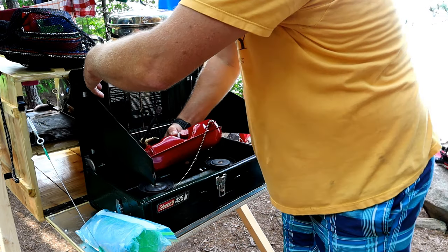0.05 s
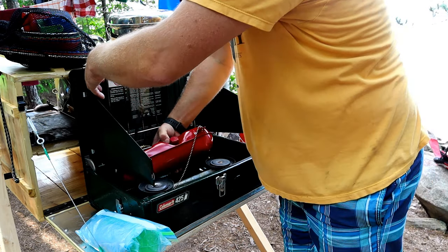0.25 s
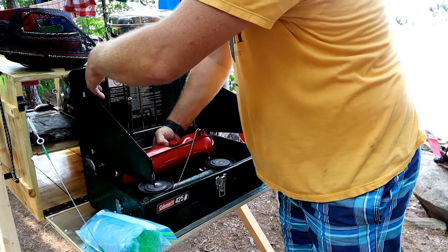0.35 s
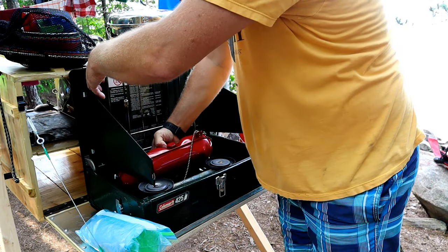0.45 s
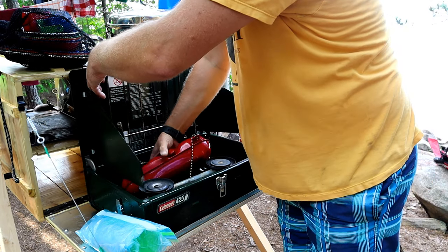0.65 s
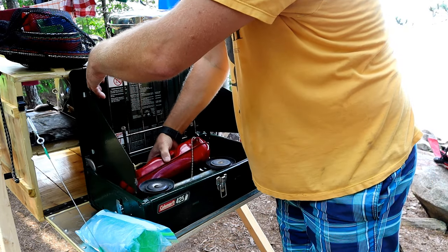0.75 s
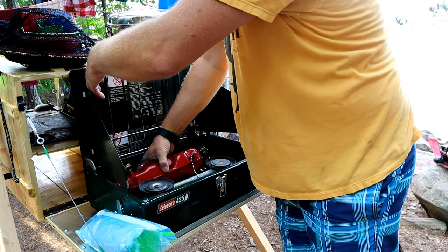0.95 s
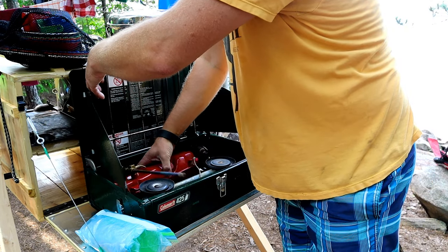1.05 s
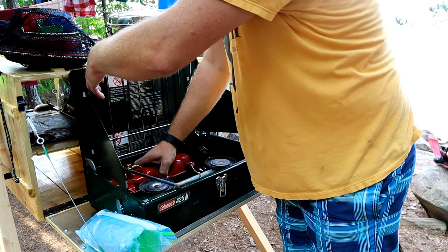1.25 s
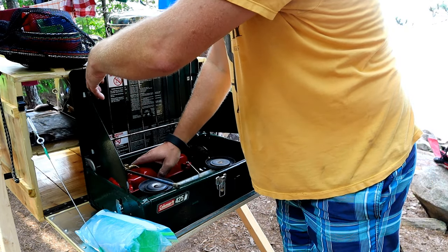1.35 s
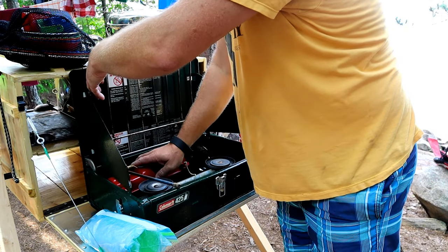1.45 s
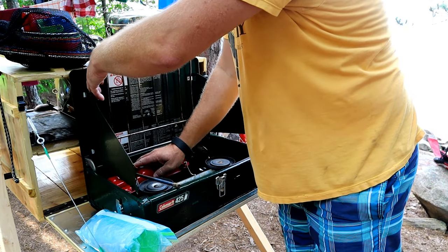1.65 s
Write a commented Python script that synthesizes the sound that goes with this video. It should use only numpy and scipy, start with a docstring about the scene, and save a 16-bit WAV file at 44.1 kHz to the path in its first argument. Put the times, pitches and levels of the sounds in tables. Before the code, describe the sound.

Close, bright metal knocking and rattling as a hollow tank is set inside a thin metal stove box; irregular clanks crowd together mid-way, then thin out, with soft low table thuds and quiet open-air hiss.

```python
"""Fuel tank knocking into a stove case

A steel fuel tank is lowered into the sheet-metal case of a camp stove, outdoors. Each knock rings
decaying sine modes: a blow rings the clear ones, blow plus rattle of loose parts the dense sheet ones.
Where it lands decides which modes sound loudest. Below lie low shudders of the table, made of
band-passed noise, and a quiet outdoor hush of drifting, spectrally shaped noise."""
import sys
import numpy as np
from scipy import signal
from scipy.fft import rfft, irfft, next_fast_len
from scipy.io import wavfile
from scipy.ndimage import uniform_filter1d

SR = 44100
rng = np.random.default_rng(int(sys.argv[2]) if len(sys.argv) > 2 else 0)


def transcribe(u):
    """Save the signal u as a 16-bit wav file named by the first command-line argument.

    u: samples, shape (n,) or (channels, n), limited to [-1, 1]; the rate is SR.
    q: integer samples, one column per channel.
    """
    v = np.clip(np.atleast_2d(u).T, -1, 1)
    q = np.round(v * 32767).astype(np.int16)
    wavfile.write(sys.argv[1], SR, q)


N = 74970

# Knocks, relative levels: (time [s], clank peak [dB], boom [dB], body [dB], sizzle [dB],
# favoured low mode [Hz], its lift [dB], favoured high mode [Hz], its lift [dB], rattle t60 [s])
KNOCKS = [(0.205,1,-10,-14,-21,948,15.5,3350,6,0.03),(.217,-12,-4,-21,-24,402,12,1630,15,0.16),(.236,-4,-23,-17.5,-20,380,-1,2700,5,0.14),(.265,-9,-14.5,-25.5,-41,670,12,1820,9,0.21),(0.2971,-10.5,-23,-22.5,-24.5,1180,6,1700,6,0.11),(.325,-13.5,-17,-52,-31.5,397,20,3030,6,0.019),(.355,-15,-25.5,-23.5,-42,396,5,3730,9,0.44),
          (0.435,-11.5,-5.5,-26,-30,180,3,2300,3,0.056),(0.4428,-30,-12,-15.5,-25.5,481.3,19,1730,17,0.047),(.451,-3.5,-24,-12,-23.5,180,4,2220,14.5,0.066),(.468,-6,-14,-17.5,-17.5,182,10,2840,10.5,0.087),(0.4944,-4,-12.5,-20.5,-26,940,17,4900,5,0.1),(0.5484,-23.5,-39,-22,-41.5,944,14,2400,8,0.2),(.596,-26,-33,-21.5,-53,914,17.5,2300,12,0.11),(0.605,-17.5,-19.5,-26,-37,238,16.5,950,9,0.38),(.618,-26,-31.5,-31.5,-45,400,13.5,1730,9,.1),(0.649,-17,-46,-26.5,-50,980,14,1960,6,0.49),
          (0.6907,-10.5,-27,-23,-25,398,3,2350,7.5,0.19),(0.715,-4.5,-16.5,-15.5,-18.5,1810,12.5,4470,7.5,0.17),(0.7395,-10.5,-16.5,-11,-24.5,247,8,2350,16,0.075),(.758,3,-15,-11.5,-14.5,1600,6,2750,7.5,0.037),(0.779,-9.5,-28,-10.5,-20,940,10.5,3530,10.5,0.045),(0.7993,-5,-11.5,-14.5,-21,404,5.5,931,8.5,0.23),(0.8386,-6.5,-33,-18,-25.5,690,5,1850,4,0.077),(0.8636,-6,-13,-18.5,-29.5,177,0,1614,7,0.2),(0.8828,-11.5,-35,-12.5,-24.5,410,13.5,2030,13,0.27),(0.9314,-9,-19.5,-14,-40,917,15.5,1720,7.5,0.2),(0.9446,-15.5,-31,-10,-24,481,9,935,12,.14),(0.9549,-27,-39,-19.5,-44,943,17,4470,22,0.23),(0.9948,-7,-21,-13.5,-27,560,-13,2800,5,0.079),(1.049,-9,-25,-16,-37.5,480,15,2650,4,0.32),(1.098,-10,-28,-16,-33.5,510,12,2830,10.5,0.086),(1.1292,-17.5,-30,-16,-47,507,-1,1670,12,0.075),(1.1446,-8.5,-20,-14.5,-35.5,393,3,1470,0,0.054),(1.1552,-13.5,-27,-10.5,-33,924,14,1960,13,0.08),(1.164,-8,-13.5,-18.5,-23,397,14,930,23,0.18),(1.194,-9.5,-20.5,-14,-20,870,6.5,4390,7,0.081),
          (1.2612,0,-15,-12,-20,893,10.5,4670,3,0.033),(1.2897,-10.5,-27,-12.5,-33.5,932,15,6000,10,0.044),(1.321,-17.5,-21.5,-20,-35,690,-12,1236,15.5,0.95),(1.393,-7,-21.5,-13.5,-28.5,898,12,1300,5,0.052),(1.428,-15.5,-21,-26,-30.5,980,8,4450,11.5,0.048),(1.4704,-21.5,-25,-25,-42.5,684,-5,1480,4,0.44),(1.5323,-15.5,-22,-21,-56,348,6,1260,7,0.041),(1.5511,-27,-26,-28,-40,454,-1,2135,3,0.042),(1.6747,-32,-39,-60,-87,513,10,2130,12,.12)]
# Centres of the level regions: (boom [Hz], body [Hz], clank [Hz], sizzle [Hz])
REGIONS_HZ = (200, 600, 2200, 8000)
# Clear modes of case and tank: (frequency [Hz], relative level [dB], t60 [s])
CLEAR_MODES = [(181.8, -0.5, 0.18), (227.7, -5.5, 0.4), (242.7, -8, 0.11), (260.5, -9.5, 0.62),
               (396, -3.5, 0.28), (443.7, -5.5, 0.16), (489.8, -4, 0.075), (699, -8, 0.4),
               (818, -10.5, 0.24), (915.3, -12, 0.17), (941.3, -10, 0.15), (1151, -8.5, 0.16),
               (1290, -23, 0.06), (1634, -7, 0.061), (2047, -2.5, 0.062), (2360, -10.5, 0.32),
               (3300, -6, 0.043), (4550, -4.5, 0.1), (6070, -14, 0.27), (11530, 4, 0.09)]
# Curves for the dense small modes of the thin sheet: (frequency [Hz], relative level [dB],
# t60 before scatter [s])
SHEET_CURVE = [(250.2, -19.5, 0.25), (706, -25.5, 0.36), (1480, -21, 0.2), (2840, -20, 0.17),
               (6800, -18.5, 0.13), (9300, -25, 0.12), (10450, -17.5, 0.11), (13500, -23, 0.024),
               (15633, -52, 0.04)]
# Left-right likeness of a knock's modes: (frequency [Hz], likeness [0..1])
KNOCK_LIKENESS = [(300, 1), (600, 1), (1300, 0.88), (2500, 0.83), (7000, 0.08), (14000, 0.75)]
# Stereo lean of a knock's modes: (frequency [Hz], left minus right [dB])
KNOCK_LEAN = [(500, 0), (1200, .6), (2500, -1.8), (5000, 2.7), (9000, 0)]
# Hush spectrum: (frequency [Hz], relative density [dB])
HUSH_SPECTRUM = [(15, -34), (25, 5), (383, 4.5), (1210, -0.5), (3540, 0), (5570, -7.5), (6200, -9),
                 (7680, -9), (11200, -7), (15000, -17.5)]
# Left-right likeness of the hush: (frequency [Hz], likeness [-1..1])
HUSH_LIKENESS = [(60, 1), (380, -0.064), (2360, -0.028), (14800, -0.38)]
# Shudder of the table under the stove: (time [s], level [dB])
RUMBLE_LEVEL = [(0.15, -69), (0.244, -36), (0.288, -47), (0.706, -51), (0.783, -34), (1.124, -54),
                (1.17, -39.5), (1.3, -46), (1.7, -54)]

SHEET_COUNT = 1800
RISE_TURNS = 0.47  # cycles over which a mode swells
KNOCK_GAIN_DB, CREST_DB = -6.5, 12  # crest: a clank's peak over its mean level
FAVOUR_OCT = 0.075  # width of the lift around a favoured mode
CLEAR_SCATTER_DB, SHEET_SCATTER_DB = 1.2, 2.5
CHOKE_DB_PER_S = 247  # the next contact damps the clear modes still ringing
BLOW_DB, RATTLE_PER_S, RATTLE_SPREAD_DB = -0.5, 1200, 3
LIGHT_TAP_HZ = 470  # light taps barely move modes below this
BASS_CUT_HZ, RIGHT_LAG_S = 135, 4.2e-5
HUSH_DB, HUSH_LATE_DB, HUSH_PATCH_DB = -48, -7.5, 2.7  # late: treble change by the end
CEILING, EDGE_HZ = 1.05, 15400


def clatter():
    """Blows ring the clear modes until the next contact; blow and rattle ring the sheet; right lags."""
    hz, db, rings = steel()
    count = len(CLEAR_MODES)
    struck = np.array([strike_weights(hz, db, *row[1:-1]) for row in KNOCKS], dtype=np.float32)
    clear = struck[..., :count] @ rings[:count]
    sheet = struck[..., count:].reshape(-1, SHEET_COUNT) @ rings[count:]
    sheet = sheet.reshape(clear.shape)
    out = np.zeros((2, N))
    t = np.arange(clear.shape[2]) / SR
    gaps_s = np.diff([row[0] for row in KNOCKS], append=N / SR)
    for row, gap_s, clear_ring, sheet_ring in zip(KNOCKS, gaps_s, clear, sheet):
        choke = amp(-CHOKE_DB_PER_S * np.maximum(t - gap_s, 0))
        add(out, row[0], clear_ring * choke)
        taps = blow_and_rattle(row[-1], rng.random((3, SR // 6)))
        add(out, row[0], signal.fftconvolve(sheet_ring, taps[None], axes=1))
    out = signal.sosfilt(signal.butter(4, BASS_CUT_HZ, "high", fs=SR, output="sos"), out)
    size = next_fast_len(N)
    lag = np.exp(-2j * np.pi * np.fft.rfftfreq(size, 1 / SR) * RIGHT_LAG_S)
    right = irfft(rfft(out[1], size) * lag, size)[:N]
    return np.array([out[0], right])


def steel():
    """Modes of the metal: frequencies, levels and exponentially decaying sines."""
    curve_hz, curve_db, curve_t60_s = np.transpose(SHEET_CURVE)
    place = (np.arange(SHEET_COUNT) + rng.random(SHEET_COUNT)) / SHEET_COUNT
    sheet_hz = curve_hz[0] + (curve_hz[-1] - curve_hz[0]) * place ** 1.3  # denser at the low end
    sheet_db = read(curve_hz, curve_db, sheet_hz)
    sheet_t60_s = read(curve_hz, curve_t60_s, sheet_hz) * rng.uniform(0.7, 1.5, SHEET_COUNT)
    hz, db, t60_s = np.hstack([np.transpose(CLEAR_MODES), [sheet_hz, sheet_db, sheet_t60_s]])
    t = np.arange(SR // 4, dtype=np.float32) / SR
    turns = np.outer(hz, t).astype(np.float32)
    decay = np.exp(np.outer(-np.log(1000) / t60_s, t).astype(np.float32))
    rings = np.sin(2 * np.pi * turns) * decay
    return hz, db, rings * np.minimum(turns / RISE_TURNS, 1)


def strike_weights(hz, db, clank_db, boom_db, body_db, sizzle_db, low_hz, low_db, high_hz, high_db):
    """Landing place sets how strongly one knock rings each mode in the left and right channels."""
    same = np.clip(read(*np.transpose(KNOCK_LIKENESS), hz), 0, 1)
    lean = amp(read(*np.transpose(KNOCK_LEAN), hz) / 2)
    scatter, sign, other = rng.standard_normal((3, len(hz)))
    sign = np.sign(sign)
    lift_db = sum(lift * np.exp(-(np.log2(hz / centre_hz) / FAVOUR_OCT) ** 2)
                  for centre_hz, lift in ((low_hz, low_db), (high_hz, high_db)))
    is_clear = np.arange(len(hz)) < len(CLEAR_MODES)
    scatter_db = np.where(is_clear, CLEAR_SCATTER_DB, SHEET_SCATTER_DB) * scatter
    region_db = read(REGIONS_HZ, [boom_db, body_db, clank_db - CREST_DB, sizzle_db], hz)
    left = sign * lean
    right = (same * sign + np.sqrt(1 - same ** 2) * other) / lean
    return np.array([left, right]) * amp(KNOCK_GAIN_DB + db + region_db + lift_db + scatter_db)


def blow_and_rattle(t60_s, draws):
    """One heavy impulse, then random signed taps of loose parts, dying away exponentially."""
    t = np.arange(draws.shape[1]) / SR
    hits = draws[0] < RATTLE_PER_S / SR
    taps = hits * np.sign(draws[1] - 0.5) * amp(-RATTLE_SPREAD_DB * np.log(draws[2] + 0.0043))
    taps = taps * amp(-60 * t / max(t60_s, 0.004))
    taps = taps / (np.linalg.norm(taps) + 1e-9)
    taps = signal.lfilter(*signal.butter(1, LIGHT_TAP_HZ, "high", fs=SR), taps)
    taps[0] = amp(BLOW_DB)
    return taps


def rumble():
    """Table shudder: low band-passed noise under a level curve, alike in both channels."""
    band = signal.butter(3, (60, 125), "band", fs=SR, output="sos")
    x = signal.sosfilt(band, rng.standard_normal(N))
    return x / x.std() * amp(np.interp(np.arange(N) / SR, *np.transpose(RUMBLE_LEVEL)))


def hush():
    """Outdoor background: shaped noise in drifting time-frequency patches, its treble thinning."""
    frames, hz = N // 128 + 5, np.fft.rfftfreq(512, 1 / SR)
    a, b, c, d, patches = rng.standard_normal((frames, 257, 5)).T
    patches = uniform_filter1d(patches, size=8, axis=0)  # across frequency
    patches = uniform_filter1d(patches, size=10, axis=1)  # across time
    same = np.clip(read(*np.transpose(HUSH_LIKENESS), hz), -1, 1)[:, None]
    left = a + 1j * b
    right = same * left + np.sqrt(1 - same ** 2) * (c + 1j * d)
    spectrum_db = read(*np.transpose(HUSH_SPECTRUM), hz)[:, None]
    patch_db = HUSH_PATCH_DB * patches / patches.std()
    late_db = HUSH_LATE_DB * np.outer(np.minimum(hz / 3000, 1), np.linspace(0, 1, frames))
    z = np.array([left, right]) * amp(spectrum_db + patch_db + late_db)
    x = signal.istft(z, nperseg=512, noverlap=384)[1][:, :N]
    return amp(HUSH_DB) * x / x.std()


def amp(db):
    """Decibels to amplitude ratio."""
    return 10 ** (np.asarray(db) / 20)


def read(hz_points, values, hz):
    """Interpolate a curve over log frequency."""
    return np.interp(np.log(hz + 1), np.log(np.asarray(hz_points) + 1), values)


def add(mix, start_s, sound):
    """Add a sound into the mix in place, cut at the end."""
    part = mix[:, round(start_s * SR):][:, :sound.shape[1]]
    part += sound[:, :part.shape[1]]


def scene():
    """Sum of knocks, table shudder and hush."""
    return clatter() + rumble() + hush()


def record(dry):
    """Soft overload on the hardest peaks, then the band limit."""
    soft = CEILING * np.tanh(dry / CEILING)
    low_pass = signal.firwin(255, EDGE_HZ, window=("kaiser", 9), fs=SR)
    return signal.oaconvolve(soft, low_pass[None], "same")


dry = scene()
out = record(dry)
transcribe(out)
```